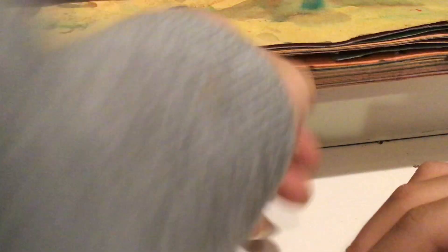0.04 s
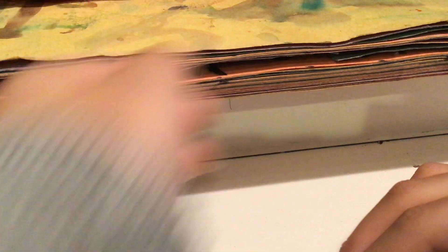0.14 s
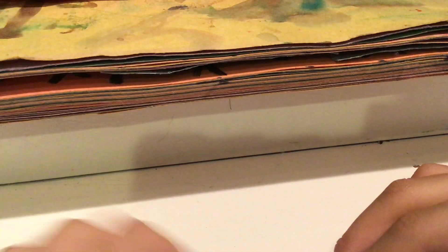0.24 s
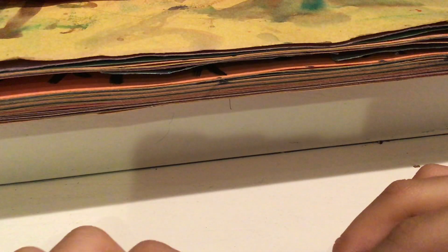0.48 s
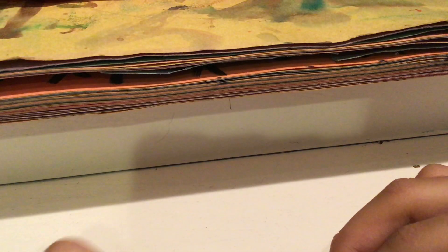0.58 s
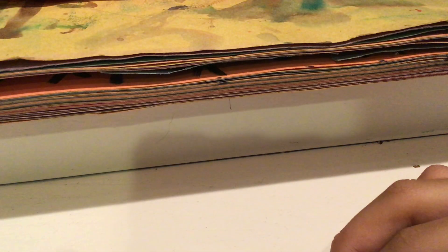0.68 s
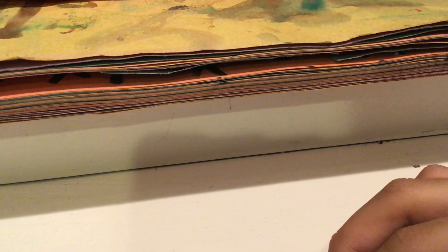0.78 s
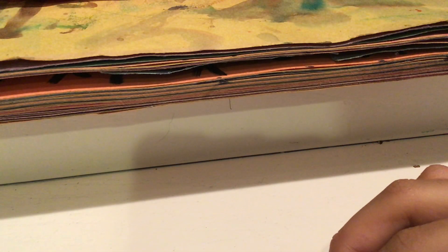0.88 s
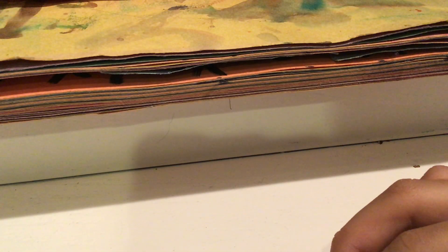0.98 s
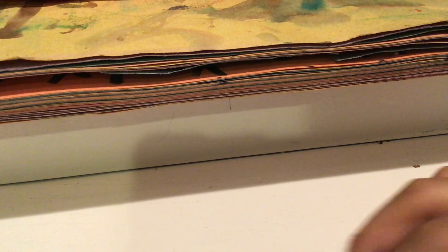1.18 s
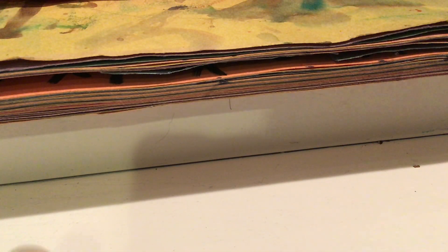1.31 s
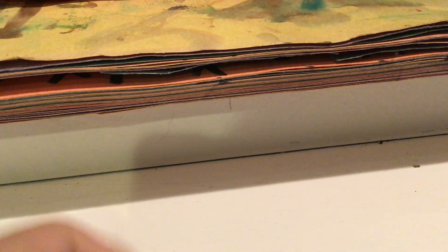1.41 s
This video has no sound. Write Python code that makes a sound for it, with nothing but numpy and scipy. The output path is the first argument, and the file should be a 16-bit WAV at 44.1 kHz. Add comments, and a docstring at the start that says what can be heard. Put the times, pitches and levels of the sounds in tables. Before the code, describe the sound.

A coin drops on a hard table, bounces and quickly rattles flat with a thin, high ring. Faint finger taps and hands brushing over paper follow, close to the microphone in a small, quiet room.

```python
"""A coin drops on a hard table close to the microphone in a small room, bounces, rattles and lies flat.
Every contact clacks, shakes the tabletop and sets the coin ringing in two very high modes that swell
and fade as it tumbles. Around it, hands brush over paper, fingers tap, a nail catches and an arm bumps
the table. The room answers briefly, over a quiet rumble."""
import sys
import numpy as np
from scipy import signal
from scipy.fft import rfft, irfft, next_fast_len
from scipy.io import wavfile

SR = 44100
rng = np.random.default_rng(int(sys.argv[2]) if len(sys.argv) > 2 else 0)


def int16_out(signal):
    """Quantize to a 16-bit WAV file."""
    q = np.round(np.clip(np.atleast_2d(signal).T, -1, 1) * 32767)
    wavfile.write(sys.argv[1], SR, q.astype(np.int16))


N = 63945
T = np.arange(N) / SR

# modes of the tabletop: pitch_hz, level_db, t60_s
TABLE_MODES = [(170.6, -1.5, 0.12), (219.6, -8, 0.14), (291, -10, 0.12), (416.7, -4, 0.11),
               (477, -11.5, .12), (552.5, -16.5, .1), (696, -4.5, 0.09), (729.3, -15.5, 0.13),
               (911, -8.5, 0.11), (1142, -9, .09), (1556, -8.5, 0.035), (2411, -11.5, 0.03),
               (3044, -13, 0.039), (3290, -11, 0.042), (3688, -2.5, 0.038), (4575, -26, .04),
               (5325, -14, 0.026), (6370, -30, .03)]
# strokes over paper: start_s, rise_s, fall_s, level_db, from_hz, to_hz, resonance_db
STROKES = [(-.02, 0.02, 0.063, -43.5, 648, 504, 15), (0.06, 0.024, 0.044, -51, 1010, 720, 11),
           (.58, 0.14, .04, -61.5, 900, 900, -1), (0.733, 0.032, 0.12, -54.5, 1200, 560, 11.5),
           (.74, 0.017, 0.11, -56.5, 3380, 3400, 11.5), (0.86, 0.02, 0.1, -51.5, 3400, 1760, 12.5),
           (.9, 0.057, .05, -56, 2870, 475, 15), (1.153, 0.02, 0.016, -47.5, 3150, 3180, 8),
           (1.15, 0.014, 0.15, -59, 620, 1160, 4.5), (1.24, 0.066, 0.058, -54.5, 940, 2530, 2),
           (1.319, 0.061, 0.042, -48, 3480, 3300, 16.5), (1.375, 0.017, 0.017, -37, 2750, 1510, 18.5),
           (1.391, 0.027, 0.036, -46.5, 1470, 547, 7), (1.379, 0.046, 0.033, -47.5, 5280, 6700, 19),
           (1.385, .017, .006, -51.5, 9300, 13100, 19.5)]
# friction on paper: frequency_hz, level_db
PAPER_SPECTRUM = [(60, -16), (200, 16), (500, 0.5), (1200, 1), (2000, -3), (3000, -9.5), (3700, -10.5),
                  (4400, -14), (6500, -21.5), (9000, -19), (16000, -15)]
# soft finger taps: start_s, thud_db, click_db, click_attack_s
TAPS = [(.002, -33, -48.5, 0.00081), (.025, -44, -73, 0.0018), (0.107, -53, -65, .002),
        (.619, -47, -70.5, 0.0022), (0.695, -47, -71, .002), (0.7335, -35, -35.5, 0.0041),
        (0.79, -42, -65, 0.0018), (1.0968, -26, -39.5, 0.00081), (1.339, -52.5, -51, .002),
        (1.403, -35, -69, .002)]
# papery click of a tap: frequency_hz, level_db
CLICK_SPECTRUM = [(60, -22), (300, 15.5), (700, -16.5), (1150, 3), (2000, -8), (2450, -2), (3000, -12.5),
                  (3700, -5.5), (4600, -24), (6500, -26.5), (8500, -33), (11000, -29.5), (16000, -32.5)]
# bumps of the arm on the table: start_s, level_db
BUMPS = [(0.108, -52), (1.098, -52.5), (1.396, -59)]
# dull body of a bump: frequency_hz, level_db
BUMP_SPECTRUM = [(30, -26.5), (70, -4), (130, 3.5), (260, -11), (900, -48.5), (16000, -83)]
# coin meeting table: start_s, clack_db, table_db, tick_db, low_ring_db, high_ring_db, angle_turns
CONTACTS = [(0.2284, -17, -19.5, -36.5, -46.5, -54.5, 0.1), (0.2511, -19.5, -62, -41.5, -36.5, -46, 0.089),
            (.3100, -23.5, -28, -41.5, -35.5, -40.5, .42), (0.334, -23, -27, -24.5, -50, -37, .17),
            (0.3435, -23.5, -35, -29, -56, -61, .17), (0.3599, -39.5, -29, -37, -58, -67, 0.17),
            (0.3678, -33, -31.5, -30, -49, -48.5, .1), (.3750, -41.5, -35.5, -32.5, -39, -51.5, 0.14),
            (0.3787, -31.5, -38, -33, -56, -45, .1), (0.383, -39, -50.5, -34.5, -40, -42.5, 0.11),
            (0.3937, -34.5, -45.5, -38, -64, -55, .1), (0.408, -49, -36.5, -35, -55.5, -55, 0.09),
            (0.4102, -33.5, -36.5, -41.5, -53, -55, .1), (0.422, -46, -52.5, -48.5, -53, -64, 0.11),
            (0.4335, -35.5, -49, -36, -52, -65, 0.46), (0.448, -44, -42, -57, -62, -66, 0.41)]
# clack of a contact: frequency_hz, level_db
CLACK_SPECTRUM = [(50, -54), (130, -4.5), (300, 2.5), (700, 1.5), (980, 0), (1170, 4.5), (1600, 1),
                  (2050, -4.5), (2450, -3.5), (3400, 1), (4100, -9), (5400, -11.5), (6600, -20.5),
                  (7600, -29.5), (16000, -24)]
# tick of the coin's rim: frequency_hz, level_db
TICK_SPECTRUM = [(100, -37.5), (2000, -12), (3500, 10), (5300, 5), (6500, 4), (7700, -4.5), (8400, 6),
                 (9000, -3), (9700, -2), (10500, -12.5), (11000, -2), (12000, -14), (13400, 2.5),
                 (14500, -7), (15500, -15.5)]
# catches of a fingernail: start_s, level_db
SNAGS = [(0.739, -47), (.773, -54), (.785, -55), (.887, -43), (0.905, -52.5), (.920, -52), (.938, -52.5),
         (0.968, -60), (1.0973, -41), (1.173, -47)]
# decay of the room: frequency_hz, t60_s
ROOM_DECAY = [(150, 0.41), (400, 0.62), (1000, 0.37), (3000, 0.36), (7000, .24), (14000, 0.19)]
# colour of the room's answer: frequency_hz, gain_db
ROOM_COLOUR = [(100, -5.5), (300, -2.5), (1000, -9.5), (3000, -7.5), (7000, -4), (14000, -8)]
# background rumble: frequency_hz, level_db
RUMBLE_SPECTRUM = [(25, -29), (50, -7), (80, 2), (130, -4), (250, -15), (600, -22), (1500, -30),
                   (3000, -32.5), (8000, -42), (15500, -39.5)]


def amp(db):
    """Decibels to gain."""
    return 10 ** (np.asarray(db) / 20)


def unit(x):
    """Scale to rms 1."""
    return x / np.sqrt(np.mean(x ** 2) + 1e-20)


def along(points, hz):
    """Read (frequency_hz, value) points on a log frequency axis."""
    frequencies, values = np.transpose(points)
    return np.interp(np.log(hz + 1), np.log(frequencies + 1), values)


def filtered(x, response):
    """Filter x by a gain that depends on frequency."""
    size = next_fast_len(N + SR // 2)
    return irfft(rfft(x, size) * response(np.fft.rfftfreq(size, 1 / SR)), size)[..., :N]


def high_pass(x, hz):
    """Thin the bass below hz."""
    return signal.sosfilt(signal.butter(N=3, Wn=hz, btype="high", fs=SR, output="sos"), x)


def noise(spectrum):
    """Coloured noise of rms 1."""
    return unit(filtered(rng.standard_normal(N), lambda hz: amp(along(spectrum, hz))))


def wood_noise(spectrum, lift_db=7.5, relative_half_width=0.04):
    """Coloured noise of rms 1 in which the tabletop's modes stand out."""
    def resonances(hz):
        peaks = [1 / (1 + ((hz / mode_hz - 1) / relative_half_width) ** 2) for mode_hz, *_ in TABLE_MODES]
        return amp(lift_db * np.max(peaks, axis=0))
    return unit(filtered(noise(spectrum), resonances))


def envelope(start, attack_s, hold_s, t60_s):
    """Straight attack, hold, exponential release."""
    t = T - start
    return np.clip(t / attack_s, 0, 1) * np.exp(-np.log(1000) * np.maximum(t - attack_s - hold_s, 0) / t60_s)


def struck(modes, start, scatter_db):
    """Damped modes from one blow, each with a slightly new strength."""
    first = max(round(start * SR), 0)
    out, t = np.zeros(N), T[:min(SR // 4, N - first)]
    for k, (hz, db, t60) in enumerate(modes):
        strength = (-1) ** k * amp(db + scatter_db * rng.standard_normal())
        decay = np.exp(-np.log(1000) * t / t60)
        out[first:first + len(t)] += strength * np.sin(2 * np.pi * hz * t) * decay
    return out


def paper_brushing(width_octaves=0.38, grain_db=3, grain_hz=504):
    """Hand and sleeve slide over paper: stick-slip friction with a resonance gliding through the stroke."""
    out = np.zeros(N)
    paper = wood_noise(PAPER_SPECTRUM)
    for start, rise, fall, db, from_hz, to_hz, resonance_db in STROKES:
        end = start + rise + fall
        hz, t, bands = signal.stft(np.roll(paper, rng.integers(N)), SR, nperseg=256)
        centre = np.interp(t, [start, end], np.log2([from_hz, to_hz]))
        octaves_off = np.log2(hz + 1)[:, None] - centre
        resonance = amp(resonance_db * np.exp(-0.5 * (octaves_off / width_octaves) ** 2))
        friction = signal.istft(bands * resonance, SR)[1][:N]
        stick_slip = amp(grain_db * np.interp(T * grain_hz, np.arange(N), rng.standard_normal(N)))
        swell = np.interp(T, [start, start + rise, end], [0, 1, 0])
        out += amp(db) * swell * unit(stick_slip * friction)
    return out


def finger_taps(corner_hz=282):
    """A soft fingertip damps the table and drives mostly its low modes: a thud under a papery click."""
    soft_modes = [(hz, db - 10 * np.log10(1 + (hz / corner_hz) ** 1.5), 0.4 * t60)
                  for hz, db, t60 in TABLE_MODES]
    out = np.zeros(N)
    for start, thud_db, click_db, attack_s in TAPS:
        out += amp(thud_db) * struck(soft_modes, start, scatter_db=0.85)
        click = envelope(start, attack_s, hold_s=0.002, t60_s=0.039) * wood_noise(CLICK_SPECTRUM)
        out += amp(click_db) * click
    return out


def arm_bumps():
    """The arm bumps the table: dull bursts of low noise."""
    return sum(amp(db) * envelope(start, attack_s=0.018, hold_s=0.01, t60_s=0.32) * noise(BUMP_SPECTRUM)
               for start, db in BUMPS)


def coin_bounces(shared_power=0.39, settle_s=0.14, settle_hz=3560, settle_octaves=0.2, settle_db=2.5):
    """Each contact gives a clack, partly alike every time, a bright rim tick and a ring of the table."""
    out = np.zeros(N)
    shared, fresh, tick = wood_noise(CLACK_SPECTRUM), wood_noise(CLACK_SPECTRUM), noise(TICK_SPECTRUM)
    for start, clack_db, table_db, tick_db, *_ in CONTACTS:
        clack = np.sqrt(shared_power) * np.roll(shared, round(start * SR))
        clack += np.sqrt(1 - shared_power) * fresh
        # nearby surfaces hold the clack for a moment
        out += amp(clack_db) * envelope(start, attack_s=0.00038, hold_s=0.0028, t60_s=0.03) * clack
        out += amp(tick_db) * envelope(start, attack_s=0.0003, hold_s=0.0005, t60_s=0.022) * tick
        # as the coin settles, its contacts ring more around settle_hz
        lift_db = settle_db * np.clip((start - CONTACTS[0][0]) / settle_s, 0, 1)
        modes = [(hz, db + lift_db * np.exp(-(np.log2(hz / settle_hz) / settle_octaves) ** 2), t60)
                 for hz, db, t60 in TABLE_MODES]
        out += amp(table_db) * struck(modes, start, scatter_db=2.0)
    return high_pass(out, hz=115)


def coin_ring(low_hz=10999, high_hz=13315, tumble_hz=9.5, catch_s=0.002, rest_s=0.472):
    """The coin rings until the next contact damps it; tumbling, its modes face the microphone by turns."""
    out = np.zeros(N)
    ends = [contact[0] for contact in CONTACTS[1:]] + [rest_s]
    for (start, *_, low_db, high_db, angle_turns), end in zip(CONTACTS, ends):
        free_ring = envelope(start, attack_s=0.0003, hold_s=0, t60_s=1)
        damping = np.exp(-np.maximum(T - end, 0) / catch_s)
        angle = 2 * np.pi * (angle_turns + tumble_hz * (T - start))
        for hz, db, facing in (low_hz, low_db, np.cos(angle)), (high_hz, high_db, np.sin(angle)):
            out += amp(db) * free_ring * damping * facing * np.sin(2 * np.pi * (hz * T + rng.random()))
    return out


def nail_snags(centre_hz=3800, width_octaves=0.44):
    """A fingernail catches and ticks the upper modes of the tabletop."""
    upper_modes = [(hz, db - 10 * np.log10(1 + (np.log2(hz / centre_hz) / width_octaves) ** 4), t60)
                   for hz, db, t60 in TABLE_MODES]
    return sum(amp(db) * struck(upper_modes, start, scatter_db=3.5) for start, db in SNAGS)


def room(x, delay_s=0.0041, gain_db=-11):
    """The small room's answer reaches the microphone just after the direct sound; its treble dies first."""
    hz, t, bands = signal.stft(rng.standard_normal(SR // 2), SR, nperseg=256)
    decay = np.exp(-np.log(1000) * t / along(ROOM_DECAY, hz)[:, None])
    tail = signal.istft(bands * decay, SR)[1]
    tail *= np.clip(np.arange(len(tail)) / SR / delay_s - 0.5, 0, 1)
    wet = signal.fftconvolve(x, tail / np.linalg.norm(tail))[:N]
    return amp(gain_db) * filtered(wet, lambda hz: amp(along(ROOM_COLOUR, hz) + 0))


def scene(crossfade_s=0.1):
    """Coin and hands close to one microphone; the room answers a little differently as they move."""
    clatter, ring = coin_bounces(), coin_ring()
    knocks = finger_taps() + arm_bumps() + nail_snags()
    brushing = paper_brushing()
    into_room = clatter + amp(-7.5) * ring + amp(2.5) * knocks + brushing
    blend = np.pi / 2 * T / crossfade_s  # swings between two tails of the room
    reverb = room(into_room * np.cos(blend)) + room(into_room * np.sin(blend))
    rumble = amp(-63) * noise(RUMBLE_SPECTRUM)
    return (clatter + ring + knocks + brushing + reverb + rumble)[None]


def record(dry, low_cut_hz=45, top_hz=15900):
    """The recorder thins the deep bass and keeps nothing above its band limit."""
    return filtered(high_pass(dry, low_cut_hz), lambda hz: hz < top_hz)


dry = scene()
out = record(dry)
int16_out(out)
```